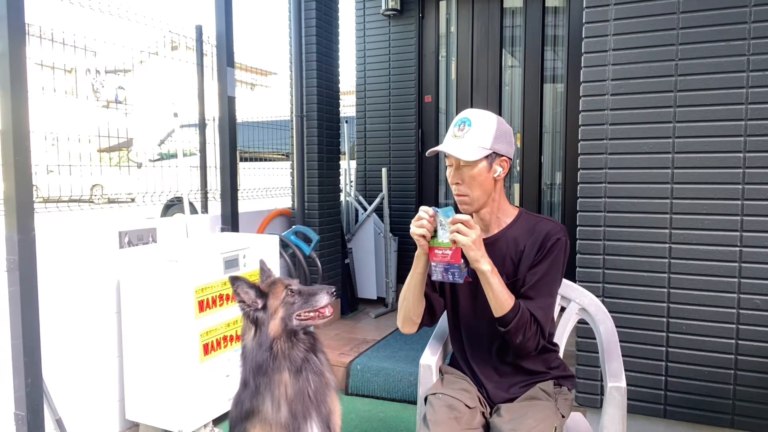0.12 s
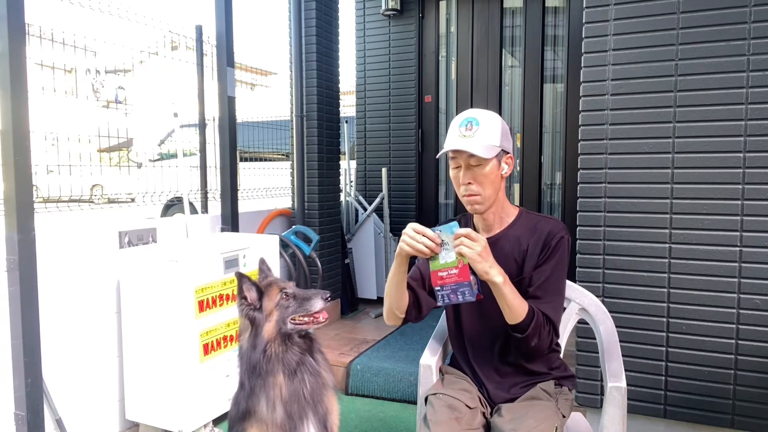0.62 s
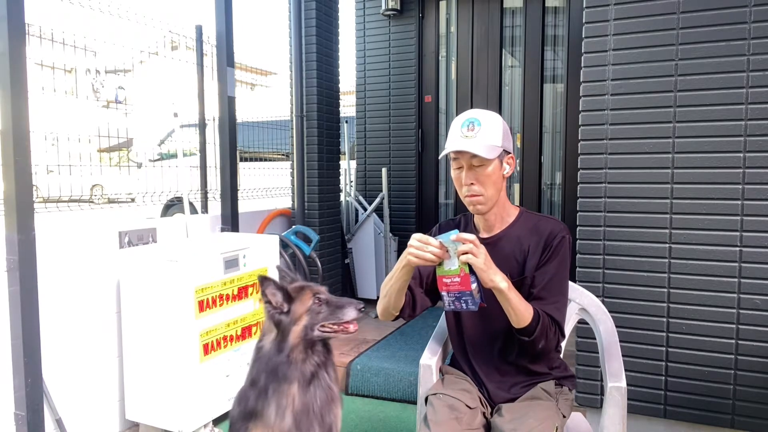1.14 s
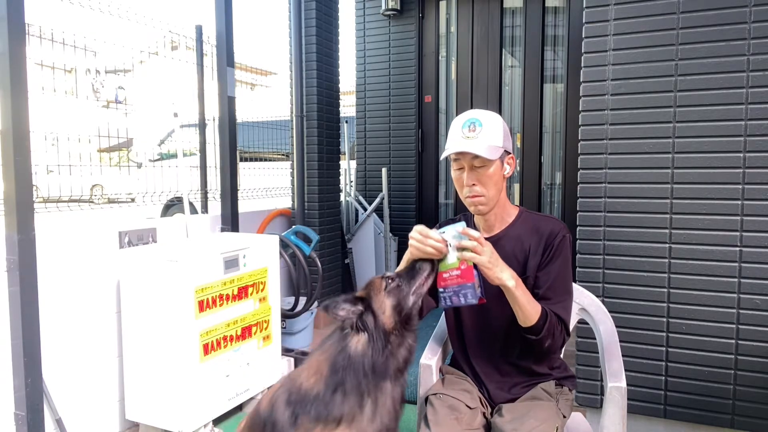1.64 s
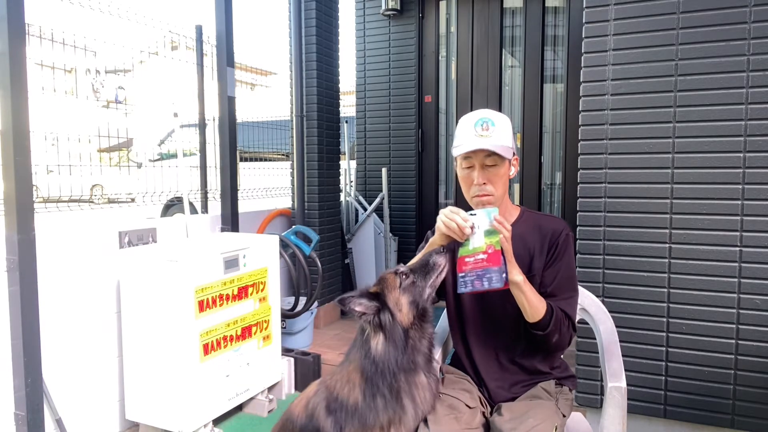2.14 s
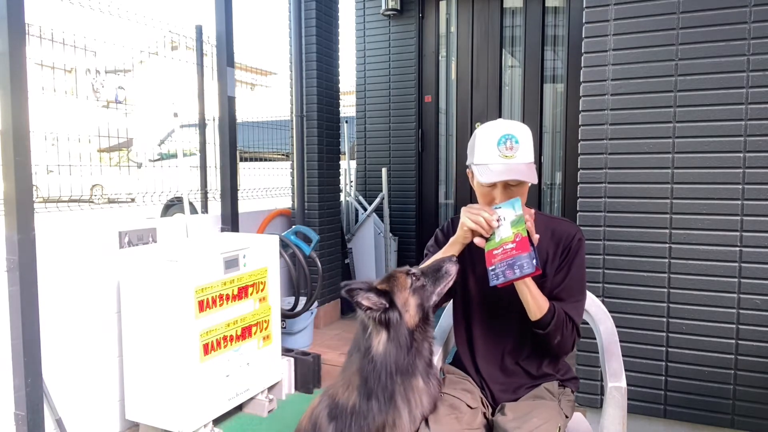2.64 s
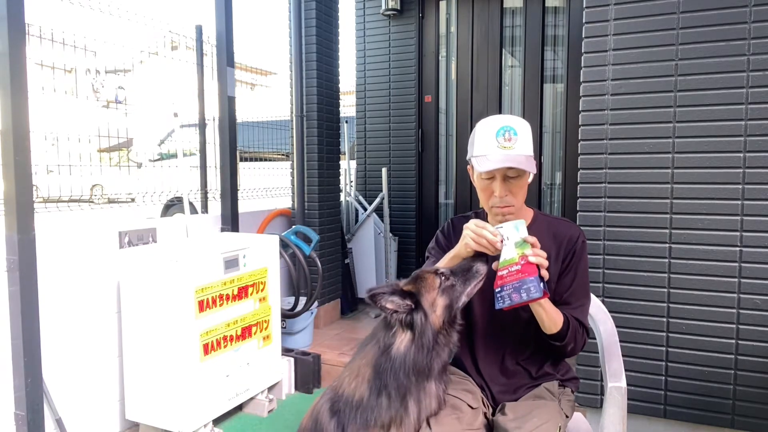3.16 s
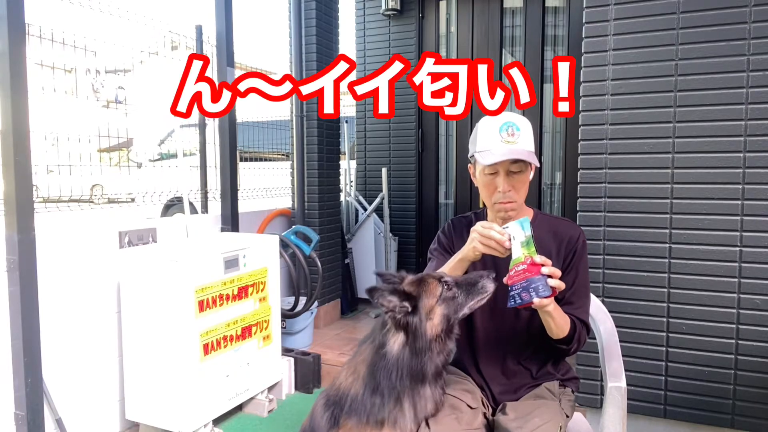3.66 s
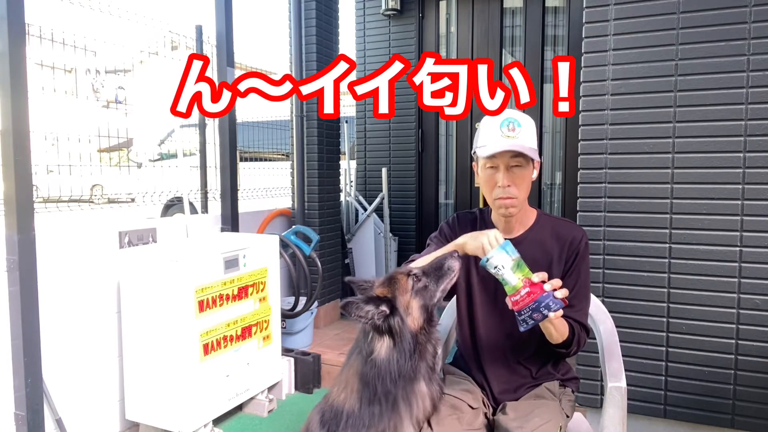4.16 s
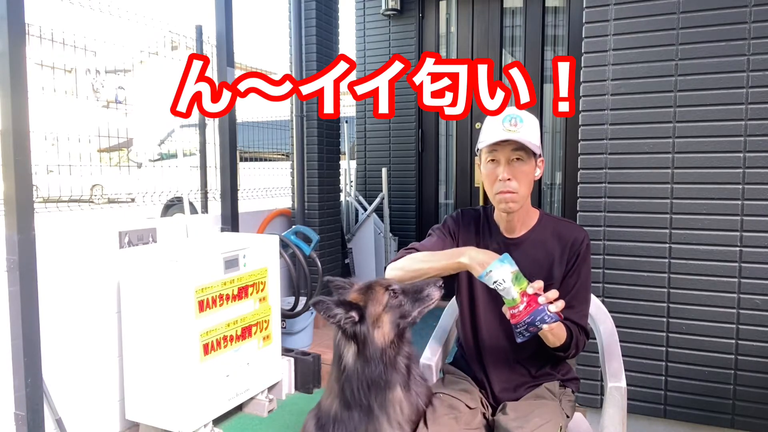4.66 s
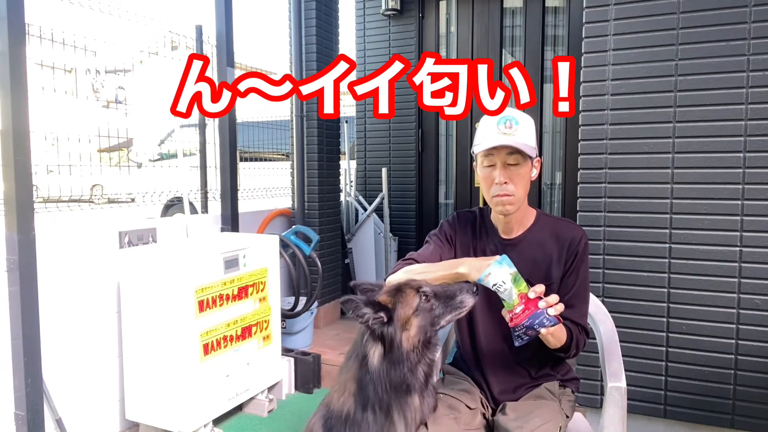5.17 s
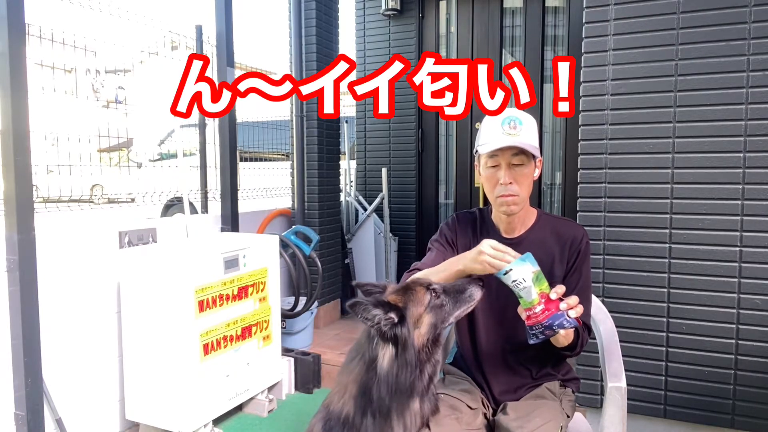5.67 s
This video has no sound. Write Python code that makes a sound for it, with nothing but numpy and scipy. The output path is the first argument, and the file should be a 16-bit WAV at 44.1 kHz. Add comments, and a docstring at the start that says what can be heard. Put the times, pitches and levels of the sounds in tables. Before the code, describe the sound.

Crisp film pops, ticks and rustles as a treat bag is handled outdoors, with low wind bumps and faint distant street noise.

```python
"""On a porch, a stiff plastic pouch is opened and handled: creases snap, panels pop and the film rustles.
Snaps are short noise bursts with ringing sines; the rustle is many tiny clicks blurred into a hiss.
The porch walls answer the pouch with fading noise. Gusts of wind, made of swelling low noise, thud on
the two microphone ports, over the steady noise of a far street.
The pouch stands to one side, so the left port hears it a little late."""
import sys
import numpy as np
from scipy import signal
from scipy.fft import rfft, irfft, next_fast_len
from scipy.io import wavfile
from scipy.ndimage import uniform_filter1d, map_coordinates

SR = 44100
rng = np.random.default_rng(int(sys.argv[2]) if len(sys.argv) > 2 else 0)


def master(y):
    """Save y as 16-bit WAV."""
    cut = np.clip(np.atleast_2d(y).T, -1, 1)
    pcm = np.round(cut * 32767)  # scale
    wavfile.write(sys.argv[1], SR, pcm.astype(np.int16))


def to_linear_factor(level_db):
    """Convert decibel levels (scalar or array-like) to linear amplitude factors."""
    exponent = np.asarray(level_db, float) / 20
    return 10 ** exponent


N = 255603  # length in samples

# Time and frequency axes of one snap; its crease breaks at sample BREAK.
SNAP_T = np.arange(2048) / SR
SNAP_HZ = np.fft.rfftfreq(len(SNAP_T), 1 / SR)
BREAK = 256


def hump(centre_hz, width):
    """A smooth bump around one frequency, its width in natural-log units of frequency."""
    return np.exp(-(np.log(SNAP_HZ / centre_hz + 1e-9) / width) ** 2)


# The lower part of the colour of a snap. Each row: frequency in Hz, level in dB per Hz.
FILM_COLOUR = [(300, 5.5), (1000, 1), (2500, 3.5), (5000, -2.5)]


def film_colour(top_db, crease_hz, hump_db):
    """The film sounds broad, with a hump set by the crease length that stands out more in duller snaps."""
    treble = [(7000, 0.4 * top_db + 2.0), (8800, top_db + 5.5), (12000, top_db + 5.0), (16000, top_db - 0.5)]
    broad = to_linear_factor(along(FILM_COLOUR + treble, SNAP_HZ))
    return broad * (1 + to_linear_factor(hump_db - 0.44 * top_db) * hump(crease_hz, width=0.15))


TEAR_S = .00042  # typical time for the burst to reach its peak; it varies from snap to snap
DULL_SLOWER = 0.17  # dB longer tear per dB of lost treble
SETTLE_PER_S, SETTLE_DB, SETTLE_T60_S = 140, -12, .14  # crackles after the break: rate, level, fading
CREAK_S, CREAK_DB = 0.0013, -14  # creak before the break: growth time, level
EVEN = .6  # share of the crack's chance colour that is smoothed away


def crack_of_crease(colour, top_db):
    """A crease creaks, lets go in a short noise burst and settles in a few smaller crackles."""
    t = SNAP_T
    tear = t / (TEAR_S * to_linear_factor(rng.normal(0, 2) - DULL_SLOWER * min(top_db, 0)))
    burst = tear * np.exp(1 - tear) * rng.standard_normal(len(t))
    chance = rng.random(len(t)) < SETTLE_PER_S / SR
    after = chance * to_linear_factor(SETTLE_DB - 60 * t / SETTLE_T60_S + 1.9 * rng.standard_normal(len(t)))
    burst = burst + signal.fftconvolve(burst[:256], after * (t < .04))[:len(t)]
    growth = np.exp((t - t[BREAK]) / CREAK_S) * (t < t[BREAK])
    creak = to_linear_factor(CREAK_DB) * growth * rng.standard_normal(len(t))
    z = rfft(np.roll(burst, BREAK) + creak)
    evened = z / uniform_filter1d(np.abs(z) ** 2, size=40) ** (EVEN / 2)
    crack = irfft(evened * colour, len(t))
    # the loudest moment becomes about 1
    return crack / np.sqrt(4 * uniform_filter1d(crack ** 2, size=32).max())


def panel_pop(pop_db, panel_hz):
    """The limp panel beside a crease rings briefly in four modes and rattles as it rings."""
    t = SNAP_T
    scatter = 0.062 * rng.standard_normal((4, 1)) * [[0], [1], [1], [1]]
    ratios = [[1], [1.5], [.8], [1.18]] * (1 + scatter)
    sines = np.sin(2 * np.pi * (panel_hz * ratios * t + rng.random((4, 1))))
    modes = to_linear_factor([[0], [-11], [-7], [-5]]) * sines
    steps = np.repeat(rng.standard_normal((4, 32)), 64, axis=1)
    rattling = modes * to_linear_factor(6 * uniform_filter1d(steps, size=48))
    # a short knock and a longer ring, both with a soft start
    fading = to_linear_factor(-60 * t / 0.048) + to_linear_factor(2.5 - 60 * t / 0.0083)
    ring = fading * (1 - np.exp(-t / 0.0007)) * rattling.sum(0)
    return to_linear_factor(pop_db - 4.0) * np.roll(ring, BREAK)


def pulse(colour, like):
    """One click of a given colour, as strong as another sound."""
    return unit(np.roll(irfft(colour, len(SNAP_T)), BREAK)) * np.std(like)


# Creases buckling beside a panel. Each row: time in seconds, level of the snap in dB, strength of the
# pop against the snap in dB (before a fixed trim), treble setting in dB (lower is duller), panel pitch in Hz.
SNAPS = [(0.2975, -40.5, -12, -5, 504), (0.4497, -25.5, -14, -15, 1520), (0.461, -14, -10.5, -11.5, 1460),
         (0.715, -45.5, 4, -5, 1370), (0.857, -26.5, -7.5, -9, 1244), (0.9303, -24.5, 1.5, -20, 1725),
         (1.194, -28, -4, -15.5, 1595), (1.291, -14, -15, -7.5, 1220), (1.333, -48, 17, -20, 1310),
         (1.3576, -24.5, -10, -11.5, 776), (1.389, -45.5, 16.5, -18, 1585), (1.4687, -22.5, -8.5, -6, 1150),
         (1.5003, -19, -11.5, -1, 926), (1.5539, -22, 2, -29, 1570), (1.6011, -22.5, -0.5, -27, 1395),
         (1.694, -38.5, 8.5, -20, 1170), (1.8454, -26.5, 1.5, -17, 983), (2.0379, -52.5, 29.5, -39, 946),
         (2.0444, -52.5, 32, -30, 585), (2.058, -50.5, 28.5, -32, 604), (2.4208, -33.5, 3.5, -20.5, 1117),
         (2.611, -19, -21.5, -13.5, 1220), (2.705, -23, -5, -27, 1410), (2.758, -19, -4, -12, 1317),
         (2.8036, -19.5, -3.5, -10, 1450), (2.927, -37, 4.5, -27, 1280), (3.0694, -26.5, -3, -28, 533),
         (3.2162, -24, -1, -18, 1394), (3.3018, -19, -1, -22, 1108), (3.4032, -23.5, -5.5, -8, 1346),
         (3.4657, -31.5, 1, -45, 1310), (3.515, -16, -9, -15, 1340), (3.6767, -17.5, -16, -9, 486),
         (3.8029, -23.5, -9, -10, 1390), (3.885, -23, -13, -9, 580), (3.926, -9, -17, -9.5, 1330),
         (3.9821, -12, -6, -17, 1453), (4.0035, -10.5, -20, -5, 1060), (4.0508, -16.5, -7, -16, 1105),
         (4.321, -18, -13.5, -13, 1490), (4.3456, -11, -12, -11.5, 894), (4.398, -13, -14, -25, 1370),
         (4.4471, -11.5, -13, -5.5, 980), (4.6509, -16, -14, -6.5, 1540), (4.6778, -29, 8.5, -14, 1145),
         (4.6959, -15, -5, -15, 1320), (4.8584, -20.5, -6, -13, 1055), (5.039, -21.5, -9.5, -24, 1330),
         (5.354, -45, 7.5, -37.5, 1213), (5.5203, -25, -20, -17, 517), (5.5698, -31, 8.5, -40, 1092)]
# Clean cracks with only a faint pop. Each row: time in seconds, level in dB, treble setting in dB
# (lower is duller), crease pitch in Hz.
TICKS = [(0.1827, -34.5, 8, 5000), (0.9403, -19, -7.5, 3100), (1.5323, -15, -11.5, 6700),
         (1.5806, -11, -9, 6400), (1.8015, -4.5, -4, 5700), (1.8076, -8, -0.5, 4800),
         (2.3888, -34.5, -6, 3000), (2.734, -23, -22, 2480), (2.7428, -25, -24, 2800),
         (3.1593, -12, -19, 3860), (3.2887, -28, -21, 5030), (3.556, -27, -19, 3580),
         (3.6018, -15, 0.5, 3230), (3.709, -23.5, -6, 6200), (3.7686, -14.5, -1, 3870),
         (4.0559, -16.5, -11, 4250), (4.121, -20, -11, 5900), (4.4151, -7.5, 2, 3370),
         (4.6278, -9.5, -4.5, 3900), (4.7161, -9, -3.5, 4080), (4.7809, -0.5, 3, 5560),
         (4.8315, -19.5, -9, 5200)]
# creases beside a panel have their hump near this pitch, each a little off
CREASE_HZ, CREASE_SCATTER_OCTAVES = 3850, .3


def snaps(walls_db, pop_walls_db):
    """Each crease lets go in a crack, the panel beside it pops, and the walls answer both."""
    out = np.zeros((2, N + SR))
    popping = [(*row, CREASE_HZ * 2 ** rng.normal(0, CREASE_SCATTER_OCTAVES), -3.0) for row in SNAPS]
    clean = [(s, db, -26, top_db, 1300, crease_hz, 3.0) for s, db, top_db, crease_hz in TICKS]
    for s, db, pop_db, top_db, panel_hz, crease_hz, hump_db in popping + clean:
        colour = film_colour(top_db, crease_hz, hump_db)
        crack = crack_of_crease(colour, top_db)
        pop = panel_pop(pop_db, panel_hz)
        # the walls hear the pouch from all sides, so its fine colour evens out
        to_walls = to_linear_factor(walls_db) * pulse(colour, crack)
        to_walls = to_walls + to_linear_factor(pop_walls_db) * pulse(hump(panel_hz, width=0.35), pop)
        echo = signal.fftconvolve(to_walls[None], porch(), axes=1)
        at = round(s * SR) - 236  # room for the creak before the break
        out[:, at:at + len(crack)] += to_linear_factor(db) * (crack + pop)
        out[:, at:at + echo.shape[1]] += to_linear_factor(db) * echo
    return out[:, :N]


# Fingers working the film. Each row: start of the hold in seconds, length of the hold in seconds,
# squeeze level in dB (before the trims of each layer).
SQUEEZES = [(0.115, 0.384, -54.5), (0.836, 0.52, -53), (1.545, 0.12, -48), (1.905, 0.025, -45),
            (2.21, 0.085, -62), (2.746, 0.16, -54), (3.203, 0.094, -49.5), (3.67, 0.2, -51),
            (4.126, 0.37, -49), (4.67, 0.17, -52.5), (5.485, 0.022, -53.5)]
# Colour of the bright creases and the hiss. Each row: frequency in Hz, level in dB per Hz.
BRIGHT_COLOUR = [(300, -21.5), (1200, 10), (3000, 5.5), (6000, -3.5), (16000, -4.5)]
# Colour of the small dull creases. Each row: frequency in Hz, level in dB per Hz.
DULL_COLOUR = [(500, -1.5), (1300, 2.5), (3500, -18.5), (7000, -9.5)]
GRIP_DB_PER_S, LET_GO_DB_PER_S = 96.5, 86  # how fast a squeeze rises and falls


def rustle(walls_db):
    """Countless tiny creases, dull and bright, in clumps, blur with their echoes into a grainy hiss."""
    s, hold_s, db = np.transpose(SQUEEZES)
    level_db = swell(s, s + hold_s, db, GRIP_DB_PER_S, LET_GO_DB_PER_S)
    # chance of a crease at each sample, rising and falling to make clumps
    busy = 330 / SR * to_linear_factor(5 * np.array([wobble(30), wobble(30)]))
    sizes = to_linear_factor(5.5 * rng.exponential(size=(2, N)).clip(0, 3))
    dull, bright = (rng.random((2, N)) < busy) * sizes * rng.standard_normal((2, N))
    dull = to_linear_factor(level_db - 8.5) * coloured(dull, DULL_COLOUR)
    bright = to_linear_factor(level_db - 10.5) * coloured(bright, BRIGHT_COLOUR)
    dry = dull + bright
    hiss = to_linear_factor(level_db - 6.5 + 3 * wobble(14)) * pair(BRIGHT_COLOUR, ALIKE)
    echo = signal.fftconvolve(dry[None], porch(), axes=1)[:, :N]
    return dry + hiss + to_linear_factor(walls_db) * echo


# How long the slow part of the echo lasts. Each row: frequency in Hz, time to fall 60 dB in seconds.
ECHO_TIMES = [(500, 0.54), (1500, 0.23), (4000, 0.35), (9000, 0.27), (16000, 0.18)]
# What the walls return. Each row: frequency in Hz, level in dB.
CLADDING = [(3000, 3.5), (12000, -5)]
# Likeness of the two ports, also for the hiss and the street. Each row: frequency in Hz, likeness from 0 to 1.
ALIKE = [(500, 0.15), (1200, 0.6), (5000, 0), (8000, 1), (16000, 1)]


def porch():
    """A fresh stereo answer: near walls die quickly, the yard lingers, each frequency at its own speed."""
    hz, t, z = signal.stft(pair([(1000, 0)], ALIKE, count=SR // 3), SR, nperseg=128)
    yard = to_linear_factor(-60 * t / along(ECHO_TIMES, hz)[:, None])
    near_walls = to_linear_factor(-3.0 - 60 * t / 0.11)
    returned = z * (yard + near_walls) * to_linear_factor(along(CLADDING, hz))[:, None]
    tail = signal.istft(returned, SR, nperseg=128)[1]
    # the first echoes are uneven in level, then they even out
    age = np.arange(tail.shape[1]) / SR
    echoes = np.repeat(rng.standard_normal(len(age) // 24 + 1), 24)[:len(age)]
    tail = tail * to_linear_factor(3.5 * np.exp(-age / .04) * echoes)
    # 110 samples pass before the first echo
    return np.pad(tail / np.linalg.norm(tail[0]), ((0, 0), (110, 0)))


# Gusts on the ports. Each row: time of the peak in seconds, peak level in dB, rise over 20 dB in seconds,
# fall over 20 dB in seconds, level of the sharp eddies against the gust in dB.
GUSTS = [(.14, -39.5, 0.52, 1, -27), (.6, -43.5, 0.078, 0.33, -4), (.77, -28.5, 0.077, 0.24, -14),
         (1.0, -46.5, 0.26, 0.99, -22), (1.37, -31, 0.089, 0.27, -13), (1.95, -46.5, 0.26, 0.55, 2.5),
         (2.293, -27, 0.021, 0.18, -22), (2.889, -23, 0.078, 0.12, -16), (3.2, -41, 1, 0.56, -19),
         (3.45, -29.5, 0.98, 0.2, -9.5), (3.668, -14.5, 0.11, 0.072, -9.5), (3.781, -18.5, 0.17, 0.11, -8),
         (4.16, -34, 0.044, 0.23, -29), (4.458, -23.5, 0.023, 0.012, -12.5), (4.7, -28.5, 0.29, 0.11, -9),
         (5.01, -26, 0.18, 0.2, -13.5), (5.17, -29.5, 0.16, 0.14, -13.5), (5.449, -19, 0.047, 0.064, -10),
         (5.517, -11.5, 0.041, 0.029, -0.5), (5.61, -26.5, 0.15, 0.066, -10)]
# Colour of the low buffeting. Each row: frequency in Hz, level in dB per Hz.
BUFFET_COLOUR = [(24, -33), (40, 6), (70, 10.5), (120, 0), (200, -11.5), (400, -72.5)]
# Colour of the sharp eddies. Each row: frequency in Hz, level in dB per Hz.
EDDY_COLOUR = [(80, -9), (160, 0), (260, -2.5), (420, -11.5), (800, -64)]
BREEZE_DB, EDDY_FLOOR_DB = -48.5, -47.5  # buffeting and sharp eddies between gusts
LEE_DB, LEE_GROWS = -3, 0.1  # left minus right at a full gust, and its change per dB weaker
FULL_GUST_DB = -18


def wind():
    """Lumpy pressure on the membranes, partly shared; gusts shed sharp eddies, strong ones favour the right."""
    s, db, rise_s, fall_s, sharp_db = np.transpose(GUSTS)
    eddy_db = swell(s, s, db + sharp_db, 20 / rise_s, 20 / fall_s)
    gust_db = swell(s, s, db, 20 / rise_s, 20 / fall_s)
    weaker_db = FULL_GUST_DB - gust_db
    pan_db = np.minimum(LEE_DB + LEE_GROWS * weaker_db, 0)
    lumps = to_linear_factor(2.5 * np.array([wobble(30), wobble(30)]))
    buffet = steady(pair(BUFFET_COLOUR, [(60, 0.32)]), span_s=0.035)
    eddies = unit(lumps * steady(pair(EDDY_COLOUR, [(200, 0.43)]), span_s=0.041))
    buffet = np.hypot(to_linear_factor(gust_db), to_linear_factor(BREEZE_DB)) * buffet
    eddies = np.hypot(to_linear_factor(eddy_db), to_linear_factor(EDDY_FLOOR_DB)) * eddies
    return to_linear_factor([pan_db / 2, -pan_db / 2]) * (buffet + eddies)


# Colour of the far street. Each row: frequency in Hz, level in dB per Hz.
STREET_COLOUR = [(100, -19.5), (330, -7), (640, -9), (1000, -15), (2500, -28.5), (7000, -48), (16000, -53)]
STREET_DB = -46.5  # the level it breathes around


def street():
    """Far traffic and air: coloured noise whose level breathes a little."""
    return to_linear_factor(STREET_DB + 1.88 * wobble(12.0)) * pair(STREET_COLOUR, ALIKE)


def unit(x):
    """Scaled to rms 1."""
    return x / np.sqrt(np.mean(x ** 2) + 1e-20)


def along(points, hz):
    """Reads a curve of (Hz, value) points on a log axis."""
    f, v = np.transpose(points)
    return np.interp(np.log(hz + 1), np.log(f + 1), v)


def wobble(rate):
    """A smooth random curve, rate knots a second."""
    return map_coordinates(rng.standard_normal(int(N * rate / SR) + 4), [np.arange(N) * rate / SR])


def filtered(x, response):
    """A sound whose spectrum is multiplied by a response of frequency."""
    m = next_fast_len(N + 8192)
    return irfft(rfft(x, m) * response(np.fft.rfftfreq(m, 1 / SR)), m)[..., :N]


def coloured(x, spectrum):
    """A sound through a (Hz, dB) spectrum, scaled to rms 1."""
    return unit(filtered(x, lambda hz: to_linear_factor(along(spectrum, hz))))


def pair(spectrum, alike, count=N):
    """Two noises of one colour that share the part alike at each frequency."""
    m = next_fast_len(count)
    hz = np.fft.rfftfreq(m, 1 / SR)
    a, b = rfft(rng.standard_normal((2, m))) * to_linear_factor(along(spectrum, hz))
    share = np.clip(along(alike, hz), 0, 1)
    left = share * a + np.sqrt(1 - share ** 2) * b
    return unit(irfft([left, a], m)[:, :count])


def steady(x, span_s):
    """Slow chance swells of a noise are evened out; its waves stay."""
    power = np.abs(uniform_filter1d(x ** 2, int(span_s * SR)))
    return unit(x / (power + .05) ** .33)


def swell(rise_end_s, fall_start_s, db, rise_db_per_s, fall_db_per_s):
    """Level in dB per sample of swells that rise, hold and fall; their powers add."""
    t = np.arange(0, N + 64, 64) / SR
    early = np.clip(rise_end_s[:, None] - t, 0, None)
    late = np.clip(t - fall_start_s[:, None], 0, None)
    rise_db = early * np.reshape(rise_db_per_s, (-1, 1))
    fall_db = late * np.reshape(fall_db_per_s, (-1, 1))
    power = (to_linear_factor(db[:, None] - rise_db - fall_db) ** 2).sum(0)
    return np.interp(np.arange(N) / SR, t, 10 * np.log10(power + 1e-12))


# Left port against the right. Each row: frequency in Hz, level in dB.
PORTS = [(500, -2), (1500, -2), (5000, -1.5), (10000, -0.5)]
LAG_S = .000166  # how late the left port hears


def scene():
    """The pouch and the street reach the left port later and a little weaker; wind hits both directly."""
    left, right = snaps(walls_db=-3.5, pop_walls_db=-10.5) + rustle(walls_db=8.0) + street()
    left = filtered(left, lambda hz: to_linear_factor(along(PORTS, hz)) * np.exp(-2j * np.pi * hz * LAG_S))
    return np.array([left, right]) + wind()


def band_limit(x):
    """A steep low-pass at the top of the band."""
    return signal.sosfilt(signal.butter(12, 16470, fs=SR, output="sos"), x)


# Top edge of the microphone. Each row: frequency in Hz, level in dB.
MICROPHONE = [(15700, 1.5), (16000, -11), (17000, -49)]


def record(dry):
    """The microphone loses the highest treble, and peaks are clipped at full scale."""
    heard = filtered(dry, lambda hz: to_linear_factor(along(MICROPHONE, hz)))
    mix = np.clip(heard, -1, 1)
    return band_limit(mix)


dry = scene()
out = record(dry)
master(out)
```